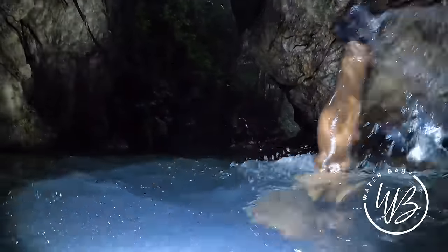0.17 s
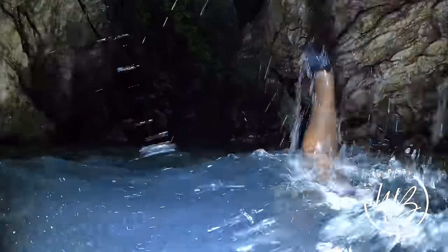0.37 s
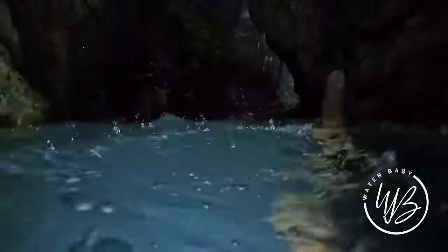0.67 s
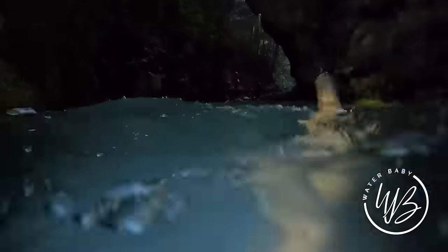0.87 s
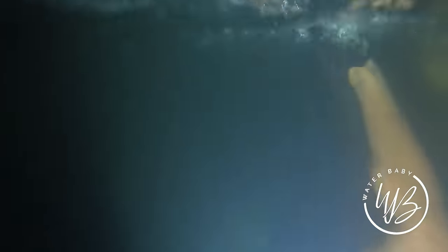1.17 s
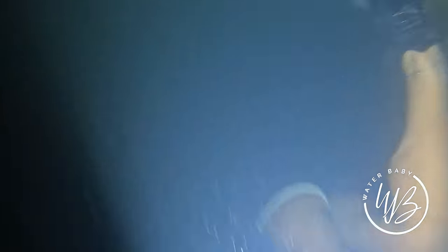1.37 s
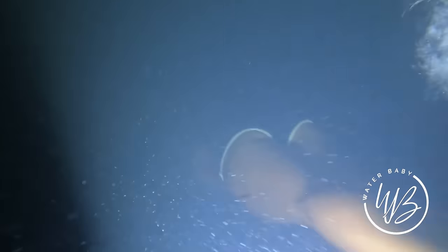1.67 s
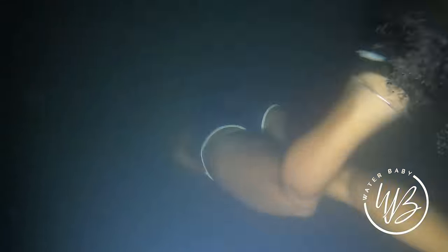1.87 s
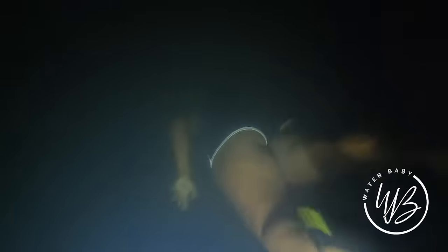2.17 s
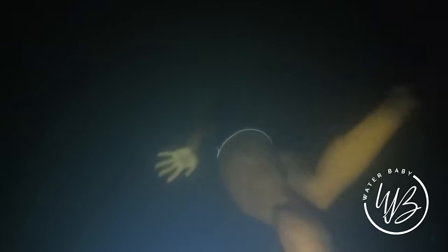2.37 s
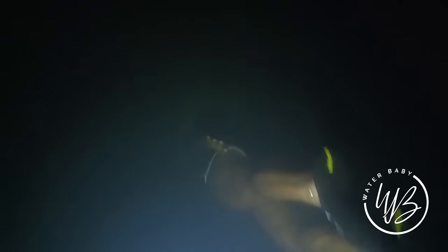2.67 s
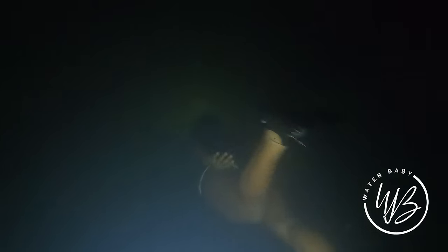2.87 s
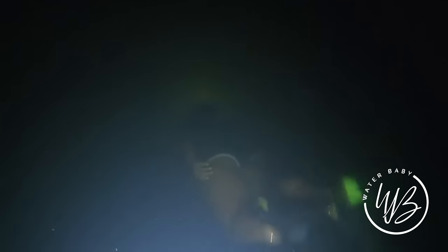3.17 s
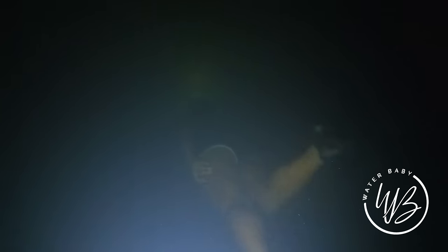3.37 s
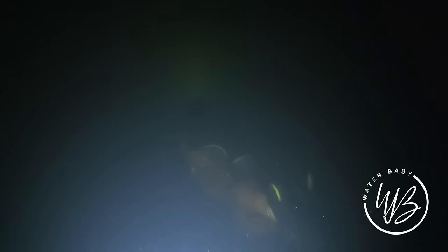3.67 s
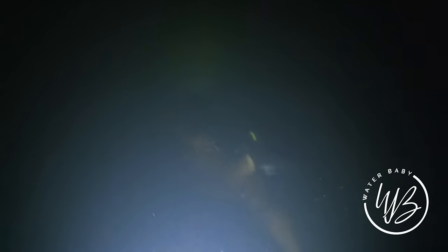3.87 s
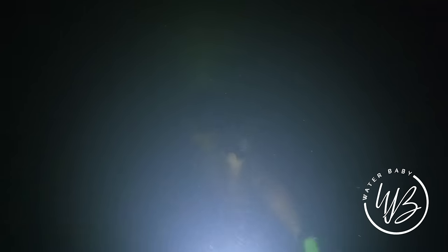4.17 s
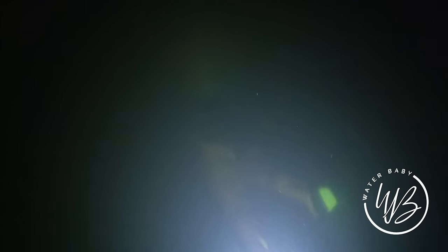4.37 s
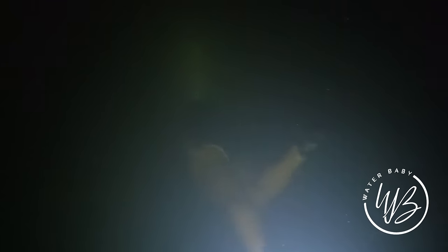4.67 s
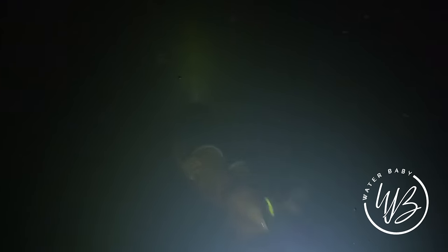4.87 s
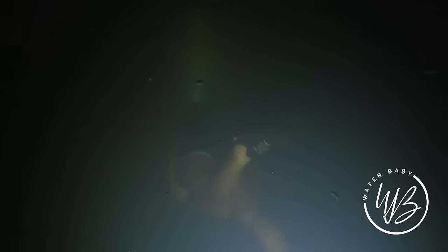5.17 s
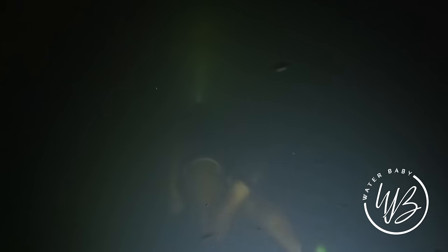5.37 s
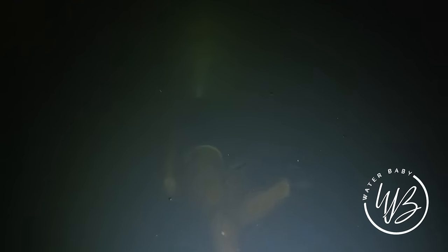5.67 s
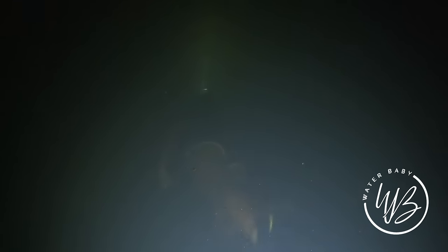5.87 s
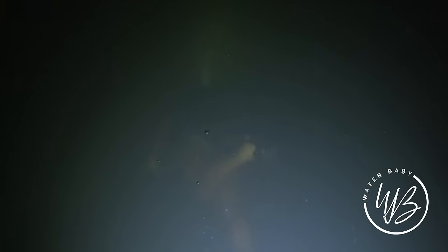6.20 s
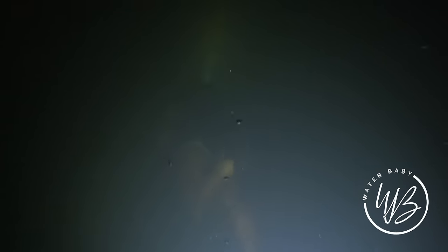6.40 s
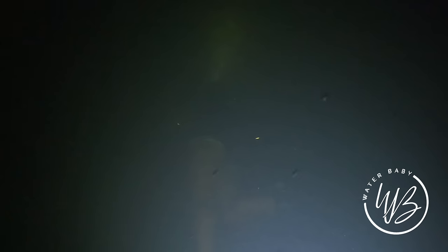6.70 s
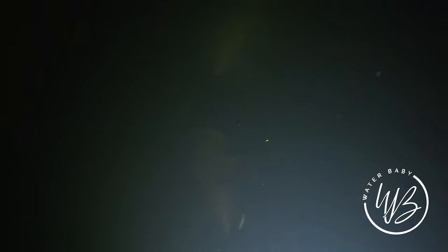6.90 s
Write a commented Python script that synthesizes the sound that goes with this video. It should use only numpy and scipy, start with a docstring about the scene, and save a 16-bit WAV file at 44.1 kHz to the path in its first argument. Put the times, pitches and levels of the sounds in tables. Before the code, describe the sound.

Rushing water fills a cave, the microphone plunges under with one sharp plop, and dull glugging, low rumbling and small ringing bubbles follow.

```python
"""Dipping into a cave river

A camera in a waterproof case follows a swimmer down a rushing cave river. The roar and spray are coloured
swarms of random bubble tones; they stop with a plop, one loud bubble, as the case dips under.
From then on three bubble swarms make a muffled churn, filtered noise a deep flow rumble, and damped sines
gulps and ringing bubbles. A resonance hums in a trapped air pocket; noise puffs and pings tick on the case.
"""
import sys
import numpy as np
from scipy import signal
from scipy.fft import rfft, irfft
from scipy.io import wavfile
from scipy.ndimage import uniform_filter1d

SR = 44100
rng = np.random.default_rng(int(sys.argv[2]) if len(sys.argv) > 2 else 0)


def put_to_file(sound):
    """Save the sound as 16-bit audio at rate SR, in the file named by the first command-line argument."""
    columns = np.atleast_2d(sound).T  # one column per channel
    safe = np.clip(columns, -1, 1)
    whole_steps = np.round(safe * 32767)
    wavfile.write(sys.argv[1], SR, whole_steps.astype(np.int16))


N = 310464
TIME = np.arange(N) / SR
UNDER_S = 0.809  # the water closes over the microphone


def from_db(db):
    """Level law: an amplitude gain is 10 to the power of dB / 20."""
    return 10 ** (np.asarray(db) / 20)


def unit(x):
    """Normalisation: scales a signal to an rms of 1."""
    return x / np.sqrt(np.mean(x ** 2) + 1e-20)


def curve(rows, t=TIME):
    """Linear interpolation: the columns of a control table at the times t."""
    s, *columns = np.transpose(rows)
    return [np.interp(t, s, column) for column in columns]


def swells(rows, clearing, t=TIME):
    """Triangular envelopes: dB over time for each level column, zero at the ends of each swell."""
    total_db = 0
    for s, rise_s, *db in rows:
        shape = np.interp(t, [s - rise_s, s, s + rise_s * clearing], [0, 1, 0])
        total_db = total_db + np.outer(db, shape)
    return total_db


def hump(hz, centre_hz, width):
    """Gaussian bell over frequency, 1 at its centre; the width is a share of the centre."""
    return np.exp(-((hz / centre_hz - 1) / width) ** 2)


def add(mix, s, sound):
    """Superposition: mixes a sound in at s seconds."""
    part = mix[max(round(s * SR), 0):][:len(sound)]
    part += sound[:len(part)]


def coloured(x, points):
    """Linear filtering: a spectral gain drawn through (Hz, dB) points, then an rms of 1."""
    hz, db = np.transpose(points)
    log_hz = np.log1p(np.fft.rfftfreq(N, 1 / SR))
    gain = from_db(np.interp(log_hz, np.log1p(hz), db))
    return unit(irfft(rfft(x) * gain, N))


def reshaped(x, field, size=1024):
    """Time-varying filtering: a gain field(s, Hz) in dB on the short-time spectra of x."""
    overlap = size * 3 // 4
    hz, t, spectra = signal.stft(x, SR, nperseg=size, noverlap=overlap)
    shaped = spectra * from_db(field(t, hz[:, None]))
    return signal.istft(shaped, SR, nperseg=size, noverlap=overlap)[1][:N]


def steadied(x, size):
    """Power levelling: dividing by the running rms takes the slow swells out of a noise."""
    power = uniform_filter1d(uniform_filter1d(x ** 2, size), size)
    return x / np.sqrt(abs(power) + 1e-9)


def dulled(x, hz):
    """Low-pass filtering: a fourth-order roll-off above hz."""
    return signal.sosfilt(signal.butter(4, min(hz, SR / 2 - 1), fs=SR, output="sos"), x)


def bubble(hz, swell_s, rise=0.008, softness=1):
    """Damped bubble resonance: swells, rings and dies while its pitch creeps up by rise per swell time."""
    u = np.arange(int(12 * swell_s * SR) + 2) / (swell_s * SR)  # time in swell times
    envelope = (u * np.exp(1 - u)) ** softness  # softness under 1: starts faster, rings longer
    cycles = hz * swell_s * u * (1 + rise * (u / 2 - 1))
    return envelope * np.sin(2 * np.pi * cycles)


def swarm(lo_hz, hi_hz, per_s, spread_db, cycles, blur_db, bunching, count=26):
    """Random superposition: bubbles of random pitch and size, born in bunches, over a wash of noise."""
    # the birth rate surges some 10 to 30 times a second
    surge = coloured(rng.standard_normal(N), [(3, -20), (10, 0), (30, -2), (90, -40), (300, -100)])
    crowd = np.exp(bunching * surge - bunching ** 2 / 2)
    size = from_db(spread_db * np.minimum(rng.standard_exponential(N), 3.5))
    born = rng.random(N) < crowd * per_s / SR
    births = size * rng.choice([-1, 1], N) * born
    pitch_index = rng.integers(0, count, N)
    out = np.zeros(N)
    for k, hz in enumerate(np.geomspace(lo_hz, hi_hz, count)):
        tone = bubble(hz, swell_s=cycles / hz)
        ringing = signal.oaconvolve(births * (pitch_index == k), tone)[:N]
        out += unit(ringing) * np.sqrt(hz)  # equal power in every hertz
    # the bubbles further off
    wash = from_db(blur_db) * np.sqrt(crowd) * rng.standard_normal(N)
    return unit(out) * np.sqrt(2 * (hi_hz - lo_hz) / SR) + wash


def snaps(rows):
    """Impulsive excitation: small impacts as band-passed puffs of noise that die at once."""
    out, t = np.zeros(N), np.arange(2048) / SR
    for s, db, hz, decay_s, width in rows:
        edges_hz = [hz / (1 + width), min(hz * (1 + width), SR / 2 - 1)]
        band = signal.butter(2, edges_hz, "band", fs=SR, output="sos")
        puff = signal.sosfilt(band, rng.standard_normal(len(t)) * np.exp(-t / decay_s))
        add(out, s, from_db(db) * puff / abs(puff).max())
    return out


# Waves heaving against the case in the air. Each row: time of the peak in seconds, time to build in
# seconds, change of the rumble in dB, change of the slosh in dB.
WAVES = [(.05, 0.083, -16, 9), (.2, 0.069, 0, 5), (.33, .04, 6, 1), (.43, 0.062, 0, -0.5),
         (.54, 0.11, 6, 3.5), (.66, 0.055, -14, 7), (.75, 0.086, -8, -4.5)]


def heave(t, hz):
    """Spectral modulation: each wave lifts or lowers the rumble and the low slosh of the roar, in dB."""
    rumble_db, slosh_db = swells(WAVES, 0.73, t)
    return rumble_db * hump(hz, 35, 0.8) + slosh_db * hump(hz, 200, 0.4)


# River in the open air. Each row: time in seconds, roar level in dB, spray level in dB.
RIVER = [(0.0, -19.5, -34.5), (0.27, -18, -33), (0.28, -18.5, -30.5), (0.346, -20, -34),
         (0.694, -18, -34.5), (0.78, -16.5, -31.5)]
# Colour of the roar. Each row: frequency in Hz, relative gain in dB.
RIVER_COLOUR = [(10, -9.5), (22, -0.5), (55, 4), (88, -11.5), (120, -3), (155, -3), (190, -8), (225, -7),
                (300, -10), (480, -11.5), (850, -15), (1400, -20), (2100, -31), (5000, -49), (7000, -92)]
# Colour of the spray through the wet microphone cover. Each row: frequency in Hz, relative gain in dB.
SPRAY_COLOUR = [(700, -26.5), (1500, 3.5), (2100, -0.5), (3300, 0), (4500, -4), (5350, -1.5), (6000, -16.5),
                (7200, -15.5), (9900, -25), (12200, -19), (14000, -33), (15500, -33.5)]
# Drops hitting the case in the air. Each row: start in seconds, peak level in dB before dulling, pitch in Hz,
# decay time in seconds, width (the band runs from the pitch divided by 1 + width to the pitch times it).
DROPS = [(.281, -15, 2300, 0.011, 1.1), (.296, -16.5, 3800, .006, 0.41), (.499, -13, 2490, 0.0045, 0.38),
         (.5505, -14, 3680, .0018, 0.33)]


def river():
    """Broadband flow noise: roar filling the cave, spray and drops, shut off as the microphone goes under."""
    roar = swarm(155.1, 3054, per_s=2500, spread_db=1.33, cycles=2.75, blur_db=2.9, bunching=0.028, count=14)
    roar = steadied(coloured(roar, RIVER_COLOUR), size=3000)
    spray = swarm(1660, 13000, per_s=3800, spread_db=0.98, cycles=1.0, blur_db=-1, bunching=0.14, count=10)
    spray = coloured(spray, SPRAY_COLOUR)
    roar_db, spray_db = curve(RIVER)
    drops = dulled(dulled(snaps(DROPS), 5600), 5600)
    in_air = np.clip((UNDER_S - TIME) / 0.015, 0, 1)
    return in_air * (from_db(roar_db) * reshaped(roar, heave, size=2048) + from_db(spray_db) * spray + drops)


CASE_HZ = 1750  # above this the case lets little of a bubble's onset through
# Single bubbles, from the plop and short gulps to ringing blips. Each row: start in seconds, peak level in dB
# before the case dulls it, pitch in Hz, swell time in seconds.
BUBBLES = [ (0.807, 1.5, 775, 0.00072), (1.007, -14, 1040, 0.00083), (1.144, -22.5, 1290, .0015),
           (1.151, -15.5, 764, 0.0015), (1.166, -17.5, 700, 0.002), (1.177, -11.5, 640, 0.0017),
           (1.187, -16.5, 1314, 0.003), (1.1975, -2.5, 650, 0.00074), (1.203, -19.5, 740, 0.0031),
           (1.221, -19.5, 1310, 0.0018), (1.255, -31, 1270, 0.0011), (1.305, -31.5, 1400, 0.001),
           (1.357, -30.5, 685, 0.0039), (1.413, -13, 62, 0.0072), (1.429, -19.5, 1045, 0.0015),
           (1.446, -14, 623, 0.0028), (1.463, -11.5, 86, 0.0071), (1.467, -25.5, 1426, 0.0042),
           (1.493, -24, 1383, 0.0026), (1.5, -20.5, 622, 0.0055), (1.533, -17, 603, 0.002),
           (1.567, -16.5, 750, 0.0018), (1.66, -16, 554, 0.0053), (1.688, -18, 182.3, 0.013),
           (1.752, -11.5, 212, 0.01), (1.8014, -14.5, 557, 0.001), (1.802, -15.5, 265, 0.0049),
           (1.825, -14.5, 309, 0.0046), (1.84, -17.5, 650, 0.0063), (1.870, -15, 692, 0.009),
           (1.972, -25.5, 1243, 0.0035), (1.975, -22, 777, 0.0091), (2.085, -12.5, 397, 0.0013),
           (2.113, -12.5, 586, 0.0034), (2.128, -18, 743, 0.0056), (2.183, -19, 592, 0.0009),
           (2.185, -30, 1280, 0.0023), (2.238, -30, 1010, 0.0007), (2.597, -20.5, 686, 0.0055),
           (2.604, -21, 511, 0.0069), (2.684, -22.5, 778, 0.0037), (2.708, -26, 1045, 0.0019),
           (2.722, -31.5, 1380, 0.0043), (2.793, -25, 1263, 0.0021), (2.968, -29, 1270, 0.0014),
           (3.008, -19, 1410, 0.003), (3.081, -21.5, 414, 0.0038), (3.109, -26, 1310, 0.0032),
           (3.155, -27, 1410, 0.003), (3.433, -30.5, 1460, 0.0038), (3.573, -21.5, 1083, 0.0037),
           (3.652, -20.5, 736, 0.0051), (3.682, -19.5, 426, 0.0051), (3.868, -19, 1180, 0.0021),
           (3.882, -14.5, 1128, 0.0035), (3.754, -44, 1910, 0.0025), (3.928, -31, 1940, 0.0014),
           (4.277, -35, 1750, 0.0011), (4.32, -24.5, 1143, 0.0015), (4.788, -41, 2120, .0018),
           (4.375, -17.5, 430, .0015), (4.485, -42, 1850, 0.0022), (4.694, -38, 1700, 0.0018),
           (4.638, -25, 1130, 0.0013), (4.6548, -12.5, 467, 0.0017), (4.684, -17.5, 1095, 0.0043),
           (4.863, -36.5, 1630, 0.003), (4.902, -41, 1640, 0.0018), (4.615, -43, 2080, 0.0018),
           (5.033, -38.5, 1870, 0.0021), (4.953, -27.5, 1290, 0.002), (4.959, -12.5, 435, 0.0022),
           (5.318, -24, 1070, 0.0017), (5.404, -31, 1770, 0.0014), (5.4988, -18, 1130, 0.0015),
           (5.561, -26, 446, 0.0024), (5.7155, -18, 580, 0.0013), (5.796, -20, 549, 0.0026),
           (6.003, -16.5, 1350, 0.00044), (6.212, -17, 327, 0.0011), (6.287, -23, 650, 0.0021),
           (6.2932, -10, 1360, 0.0017), (6.4430, -12.5, 530, 0.00092), (6.6245, -25, 1220, .0008),
           (6.6487, -17.5, 1160, 0.00086), (6.658, -15.5, 613, 0.0021), (6.7125, -16.5, 424, 0.0025),
           (6.742, -18, 1170, 0.0019), (6.868, -24.5, 933, 0.0052), (6.9454, -7.5, 525, 0.00057),
           (6.9742, -11, 1100, 0.00091), (6.981, -17, 1084, 0.0022), (6.987, -29.5, 3080, 0.0018),
           (7.003, -18, 657, 0.0034), (7.032, -10, 1192, 0.0023)]


def near_bubbles():
    """Bubble resonance: bubbles break loose right at the case, whose wall rounds off their onset."""
    out = np.zeros(N)
    for s, db, hz, swell_s in BUBBLES:
        edge_hz = max(CASE_HZ, 1.6 * hz)
        tone = bubble(hz, swell_s, rise=0.0039, softness=0.84)
        add(out, s, from_db(db) * dulled(dulled(tone, edge_hz), edge_hz))
    return out


# Dip from the surface echo. Each row: time in seconds, centre in Hz, depth in dB (negative is a bump).
SURFACE_DIP = [(.9, 1152, 11.5), (2.3, 1142, 9.5), (3.0, 1034, 11.5), (3.8, 900, 8.5), (4.5, 818, 14.5),
               (5.2, 768, 18), (6.0, 770, 11.5), (6.5, 866, -2), (7.04, 816, 1)]
# Balance of the big bubbles. Each row: time in seconds, change of the booming ones in dB, of the glugging
# ones in dB.
GLUG = [(1.0, 4, -4), (1.52, -2, -2), (1.66, -3.5, 2.5), (1.79, -4.5, 2.5), (1.9, -9.5, -8.5),
        (2.0, -6, -9), (2.1, -7.5, -1), (2.2, -5, 6.5), (2.4, -0.5, 5.5), (3.3, -2, 1.5), (4.2, 1.5, 0.5),
        (4.7, -7.5, -7.5), (6.0, -1, -5.5), (7.0, -2.5, -6.5)]


def churn_drift(t, hz):
    """Interference: the surface echo cancels a moving band; the big bubbles' balance drifts too, in dB."""
    dip_hz, depth_db = curve(SURFACE_DIP, t)
    boom_db, glug_db = curve(GLUG, t)
    big_db = boom_db * hump(hz, 140, 0.82) + glug_db * hump(hz, 350, 0.43)
    return big_db - depth_db * hump(hz, dip_hz, 0.12)


# Clouds of bubbles sweeping over the case. Each row: time at the thickest in seconds, time to gather in
# seconds, change of the churn in dB, of the seething in dB, of the fizz in dB.
CLOUDS = [(1.194, 0.054, 9, 17.5, 30.5), (1.425, 0.051, 6, 2.5, 16), (1.595, 0.064, 3.5, 7, -0.5),
          (1.71, 0.042, 3, 8, -1.5), (1.96, 0.083, 2, 5, 0), (2.11, 0.042, 5.5, -2, -3.5),
          (2.24, 0.029, 3.5, 14.5, -4), (2.59, 0.063, 4, -2, -6), (2.695, 0.065, 4, 4, -5),
          (2.97, 0.11, 3, -1.5, 3.5), (3.11, 0.081, 3, 6, -5), (3.28, 0.036, 3.5, 8, 5),
          (3.335, 0.044, -0.5, -6, 9), (3.45, 0.067, 1, -1, 8), (3.88, 0.15, -1.5, 2, 3.5),
          (3.99, 0.095, -1, -3, 5.5), (4.665, 0.12, 2.5, 0, 10.5), (5.06, 0.18, 3.5, 0, 9.5),
          (5.38, 0.079, 4, 4.5, 3), (5.56, 0.084, 6.5, 4, 7), (5.78, 0.024, 0, 6, 1),
          (6.25, 0.21, 0, -2, 8.5), (6.75, 0.15, 0.5, 1, 9), (6.99, 0.14, 7, 11, 6.5)]
CLOUD_CLEARING = 0.82  # time to clear, as a share of the time to gather
CLOUD_BRIGHT = 0.26  # share of a cloud's fizz change that the top treble gains on top
# Hollow in the fizz. Each row: time in seconds, centre in Hz, depth in dB (negative is a bump).
FIZZ_DIP = [(1.0, 2694, -0.5), (2.8, 2610, 0.5), (3.6, 2440, 4.5), (4.6, 2430, 14), (5.6, 2250, 17.5),
            (6.3, 2430, 13.5), (7.0, 2440, 20)]
# Tilt of the fizz. Each row: time in seconds, tilt in dB per octave.
FIZZ_TILT = [(1.2, -3.5), (2.8, -3.5), (3.7, 1), (7.0, -2.5)]


def fizz_drift(t, hz):
    """Time-varying spectrum: the fizz's hollow, its tilt, and its treble change inside a cloud, in dB."""
    dip_hz, depth_db = curve(FIZZ_DIP, t)
    tilt_db = curve(FIZZ_TILT, t)[0] * np.log2(np.maximum(hz, 1500) / 2900)
    cloud_db = swells(CLOUDS, CLOUD_CLEARING, t)[2]
    return tilt_db + CLOUD_BRIGHT * cloud_db * hump(hz, 7000, 0.4) - depth_db * hump(hz, dip_hz, 0.18)


# Under water. Each row: time in seconds, churn of large air pockets in dB, seething of small bubbles in dB,
# fizz on the case in dB; clouds and drifts add to these.
WATER = [(0.86, -55, -63, -99.5), (0.97, -39.5, -51, -82), (1.04, -30, -39.5, -79), (1.13, -26, -36, -70.5),
         (1.35, -40, -47, -77), (1.5, -19.5, -32.5, -69), (1.75, -18.5, -35, -79.5), (2.0, -21.5, -37, -86),
         (2.5, -32, -44.5, -74.5), (3.0, -29.5, -39.5, -62.5), (3.7, -25.5, -43.5, -60),
         (4.2, -26, -42.5, -59.5), (4.85, -26.5, -38.5, -57), (5.7, -27.5, -39.5, -53.5),
         (6.0, -24, -29.5, -50), (7.04, -31.5, -34, -52)]
# Colours of the three sizes. Each row: frequency in Hz, relative gain in dB.
CHURN_COLOUR = [(20, -23), (70, 3), (120, 1), (180, 5.5), (220, 0.5), (320, -2), (430, -6), (560, -5),
                (685, -1), (790, -7), (930, -15), (1200, -12.5), (1700, -68.5), (3000, -84.5), (6000, -110)]
SEETHE_COLOUR = [(400, -44), (800, -13.5), (1000, -4.5), (1140, 4), (1280, -4.5), (1430, -7.5),
                 (1560, -20.5), (1750, -41), (2300, -46), (5000, -72)]
FIZZ_COLOUR = [(900, -18), (1500, 2), (1950, 2), (2250, -1.5), (2550, -9), (2930, 3), (3200, -5.5),
               (3750, -7.5), (4200, -19), (4600, -25), (5100, -27), (6500, -32.5), (12000, -70.5)]


def churn():
    """Pitch falls with bubble size: glugging, seething and fizzing swarms, whose levels shift with each cloud."""
    churn_db, seethe_db, fizz_db = np.array(curve(WATER)) + swells(CLOUDS, CLOUD_CLEARING)
    large = swarm(128.0, 896, per_s=800, spread_db=1.0, cycles=1.29, blur_db=-2, bunching=0.049)
    large = steadied(coloured(large, CHURN_COLOUR), size=1400)
    small = swarm(850, 1593, per_s=450, spread_db=2.6, cycles=4.7, blur_db=-1.9, bunching=0.32, count=18)
    small = steadied(coloured(small, SEETHE_COLOUR), size=2400)
    fizz = swarm(1500, 5500, per_s=1250, spread_db=3.4, cycles=6.5, blur_db=-5, bunching=0.33, count=32)
    fizz = steadied(coloured(fizz, FIZZ_COLOUR), size=3500)
    muffled = from_db(churn_db) * large + from_db(seethe_db) * small
    return reshaped(muffled, churn_drift) + reshaped(from_db(fizz_db) * fizz, fizz_drift, size=512)


# Flow buffeting the case. Each row: time in seconds, level in dB.
FLOW = [(0.83, -40.5), (0.94, -41.5), (1.05, -25), (1.45, -21), (1.7, -29.5), (1.79, -43), (1.88, -25.5),
        (2.4, -18.5), (2.6, -23.5), (3.27, -27), (3.4, -20.5), (3.9, -23.5), (4.15, -20), (4.5, -16),
        (5.5, -18.5), (5.65, -18.5), (6.27, -18.5), (6.4, -16), (7.04, -17.5)]
# Colour of the flow. Each row: frequency in Hz, relative gain in dB.
FLOW_COLOUR = [(5, -13.5), (18, 3), (29, -1), (42, -7), (60, -11), (90, -19.5), (140, -23), (400, -84.5)]
# Upper bass of the flow. Each row: time in seconds, change in dB.
FLOW_THUD = [(1.5, 4.5), (2.4, -1.5), (3.9, 5), (5.2, -1), (7.0, -4.5)]


def thud_drift(t, hz):
    """Spectral modulation: the upper bass of the flow rises and falls, in dB."""
    return curve(FLOW_THUD, t)[0] * hump(hz, 100, 0.54)


def flow():
    """Turbulent pressure: eddies shed by the moving case press on it slowly, as low-frequency noise."""
    eddies = steadied(coloured(rng.standard_normal(N), FLOW_COLOUR), size=4000)
    eddies = reshaped(eddies, thud_drift, size=4096)
    return from_db(curve(FLOW)[0]) * dulled(eddies, 2000)


# Trapped air pocket, humming higher as it shrinks. Each row: time in seconds, pitch in Hz, level in dB.
POCKET = [(1.5, 90, -34), (1.56, 105, -24.5), (1.63, 152, -21.5), (1.7, 180, -22), (1.75, 290, -27),
          (1.85, 295, -32), (1.89, 288, -30), (2.1, 298, -37.5), (2.3, 310, -29.5), (2.55, 327, -40),
          (2.68, 345, -32), (2.83, 348, -34), (2.95, 370, -34), (3.27, 383, -37), (3.7, 410, -44)]
# The flow catching the pocket again. Each row: time at the strongest in seconds, time to build in seconds,
# extra level in dB.
POCKET_SWELLS = [(2.19, 0.043, 3), (2.275, 0.057, 9), (2.68, 0.043, 6.5), (2.79, 0.12, 7)]
POCKET_STEADY = 0.6  # strength of the even tone against the wavering part


def air_pocket(width_hz=17):
    """Driven resonance: turbulence excites the air trapped on the case, an even tone with a wavering part."""
    hz, db = curve(POCKET)
    smooth = signal.butter(2, width_hz / 2, fs=SR, output="sos")
    wander = signal.sosfilt(smooth, rng.standard_normal(N) + 1j * rng.standard_normal(N))
    drive = POCKET_STEADY + wander / np.std(wander)
    carrier = np.exp(2j * np.pi * np.cumsum(hz) / SR)
    hum = steadied((drive * carrier).real, size=2500)
    onset = np.clip((TIME - POCKET[0][0]) / 0.038, 0, 1)
    return from_db(db + swells(POCKET_SWELLS, clearing=0.88)[0]) * hum * onset


BLIPS_PER_S, BLIP_LOW_HZ, BLIP_HIGH_HZ, BLIP_SWELL_S = 29, 1380, 1970, 0.00077
BLIP_DB, BLIP_SPREAD_DB = 12.5, 4.5  # level over the fizz table, random spread either way
BLIP_TOP_DB = -44  # ceiling on the level before the spread, however thick the fizz


def stray_blips():
    """Poisson-like arrivals: at random moments a small bubble rings out of the fizz."""
    out, fizz_db = np.zeros(N), curve(WATER)[2]
    births = np.flatnonzero(rng.random(N) < BLIPS_PER_S / SR)
    for at, (pitch, size) in zip(births, rng.random((len(births), 2))):
        hz = BLIP_LOW_HZ * (BLIP_HIGH_HZ / BLIP_LOW_HZ) ** pitch
        db = min(fizz_db[at] + BLIP_DB, BLIP_TOP_DB) + BLIP_SPREAD_DB * (2 * size - 1)
        add(out, at / SR, from_db(db) * dulled(bubble(hz, BLIP_SWELL_S), hz + 800))
    return out


# Air escaping from the case. Each row: start in seconds, level in dB, pitch of the chirp in Hz.
RINGS = [(1.166, -44, 2130), (1.185, -37, 2150), (1.2, -35, 2280), (1.214, -43, 2030), (1.253, -44, 2090),
         (1.272, -48, 2230), (1.297, -51, 2210), (1.335, -52.5, 2240)]
# Modes of the case. Each row: frequency in Hz, level against the chirp in dB, decay time in seconds.
CASE_MODES = [(2950, -9, 0.007), (3720, -6.5, .007)]
RING_ATTACK_S, CHIRP_DECAY_S = 0.003, 0.013
# a chirp below the threshold (dB) stirs the modes less: they lose so many dB for each dB below it
RING_THRESHOLD_DB, RING_FALLOFF = -48, 4


def case_rings():
    """Modal excitation: thin chirps of even pitch from escaping air; the stronger ones also ring the case."""
    out, t = np.zeros(N), np.arange(SR // 5) / SR
    for s, db, chirp_hz in RINGS:
        stir_db = RING_FALLOFF * min(db - RING_THRESHOLD_DB, 0)
        partials = [(chirp_hz, 0, CHIRP_DECAY_S)]
        partials += [(hz, mode_db + stir_db, decay_s) for hz, mode_db, decay_s in CASE_MODES]
        ring = np.zeros(len(t))
        for hz, part_db, decay_s in partials:
            ring += from_db(part_db) * np.exp(-t / decay_s) * np.sin(2 * np.pi * (hz * t + rng.random()))
        add(out, s, from_db(db) * np.minimum(t / RING_ATTACK_S, 1) * ring)
    return out


# Tiny bubbles bursting on the case. Each row: start in seconds, peak level in dB before dulling, pitch in Hz,
# decay time in seconds, width (the band runs from the pitch divided by 1 + width to the pitch times it).
POPS = [(1.031, -55, 3460, 0.00091, 0.45), (1.146, -37, 2380, 0.0022, 0.35),
        (1.176, -42, 2500, 0.0014, 0.44), (1.1985, -28.5, 2280, 0.0013, 0.48),
        (1.414, -40, 2100, 0.0043, 0.36), (1.429, -33, 1950, 0.0042, 0.18), (1.478, -51, 2700, 0.0011, .45),
        (2.92, -45, 1900, .002, 0.22), (2.988, -44, 1950, .002, .2), (3.009, -46, 2200, 0.0038, .4),
        (3.088, -48, 2050, 0.0049, .2), (3.257, -43, 3000, 0.0044, .06), (3.573, -44, 2000, .002, 0.22),
        (3.756, -44.5, 3500, 0.006, 0.046), (3.828, -42, 1990, 0.0031, .15),
        (3.862, -38, 2000, 0.006, 0.11), (4.637, -42.5, 3210, 0.0018, 0.24),
        (4.731, -50, 3820, .003, 0.065), (5.371, -41.5, 3540, 0.003, 0.049),
        (5.565, -39, 2900, 0.0026, 0.16), (5.578, -34.5, 3100, 0.0025, 0.089),
        (5.762, -49, 4500, 0.008, .1), (5.802, -39, 3140, .0024, 0.054), (6.241, -31, 3000, 0.004, 0.13)]


def pops():
    """Impulsive bursts with absorption: tiny bubbles tick on the case; water and case dull the treble."""
    return dulled(snaps(POPS), 6400)


def hiss():
    """White noise: the microphone's own faint noise, at an rms of -106 dB."""
    return from_db(-106) * rng.standard_normal(N)


def scene():
    """Superposition: open air, then under water, over a faint hiss."""
    submerged = np.clip((TIME - UNDER_S) / 0.005, 0, 1)
    water = churn() + flow() + air_pocket() + stray_blips() + case_rings() + pops()
    return (river() + near_bubbles() + submerged * dulled(water, 12000) + hiss())[None]


def record(dry):
    """Clipping and band limiting: the plop just overloads the recorder, which then cuts above 15.5 kHz."""
    clipped = np.clip(dry, -0.81, 0.81)
    low_pass = signal.firwin(511, 15500, window=("kaiser", 9), fs=SR)
    return signal.oaconvolve(clipped, low_pass[None], "same")


dry = scene()
out = record(dry)
put_to_file(out)
```